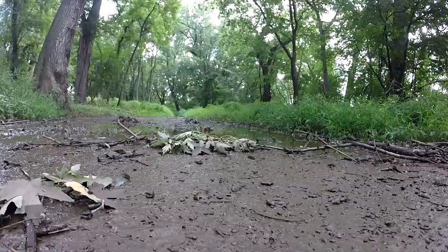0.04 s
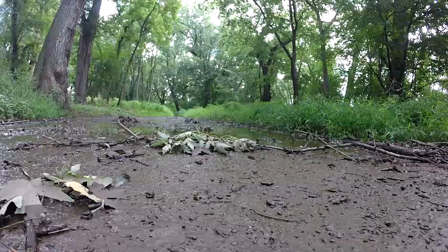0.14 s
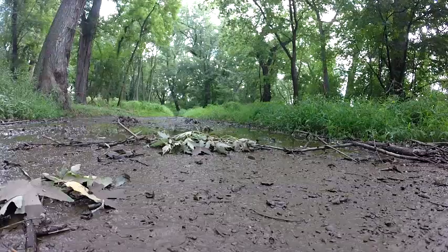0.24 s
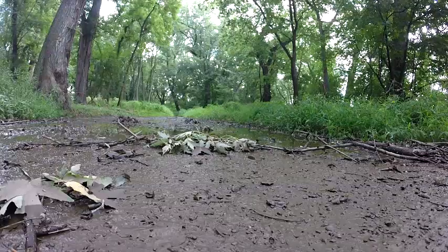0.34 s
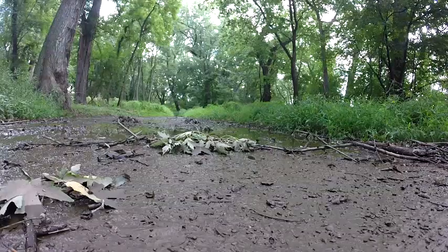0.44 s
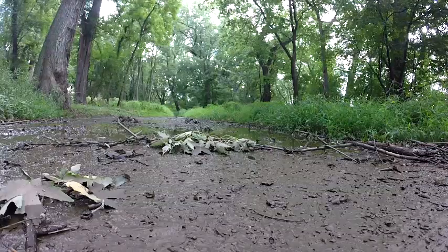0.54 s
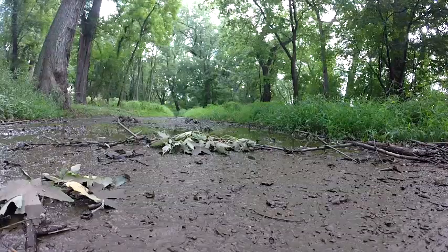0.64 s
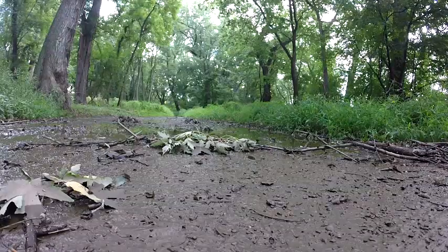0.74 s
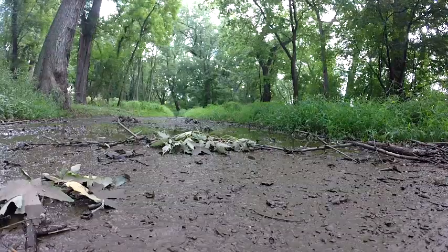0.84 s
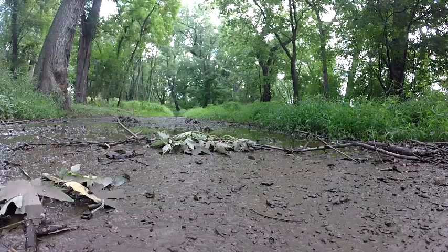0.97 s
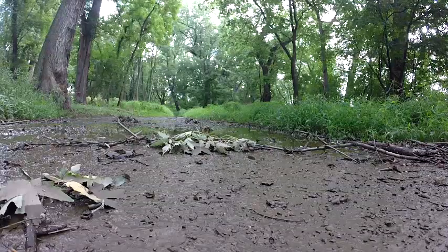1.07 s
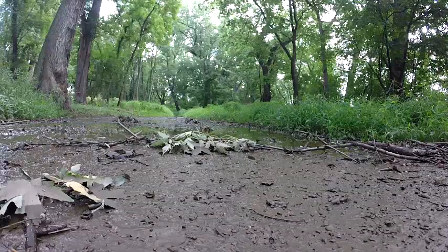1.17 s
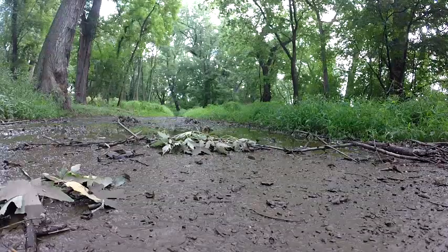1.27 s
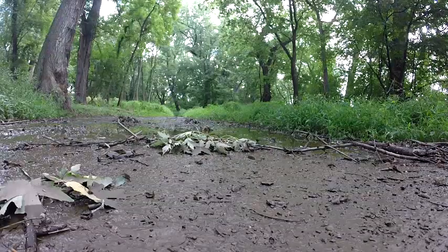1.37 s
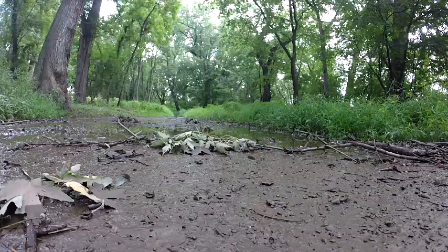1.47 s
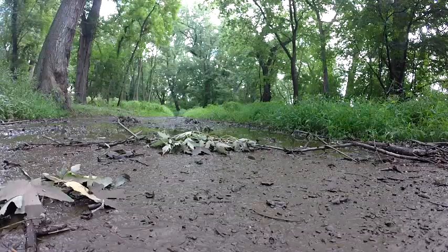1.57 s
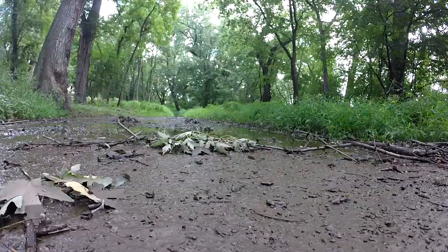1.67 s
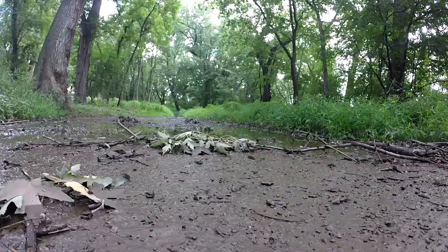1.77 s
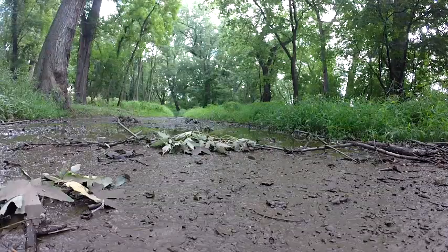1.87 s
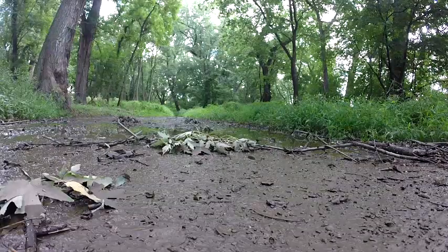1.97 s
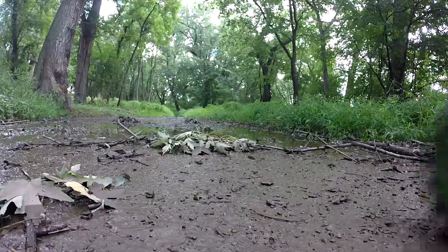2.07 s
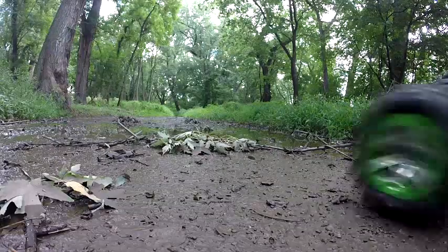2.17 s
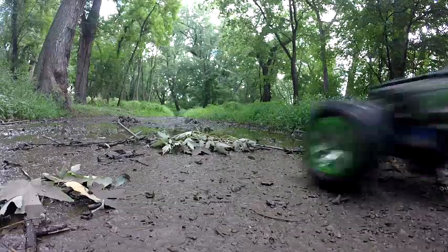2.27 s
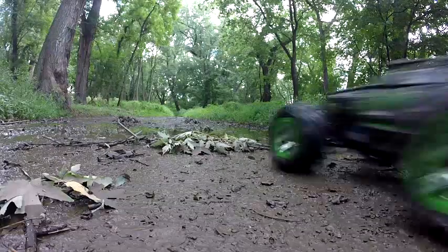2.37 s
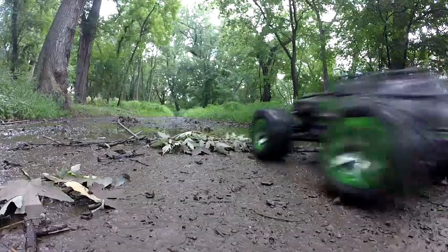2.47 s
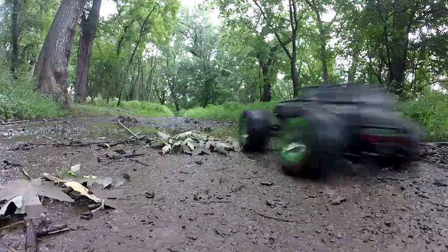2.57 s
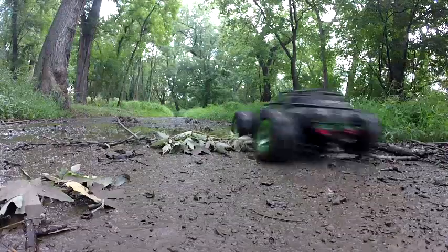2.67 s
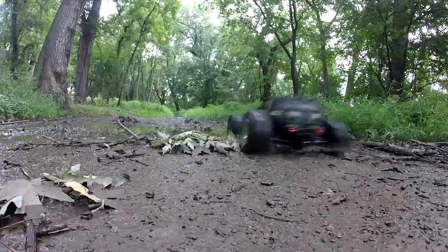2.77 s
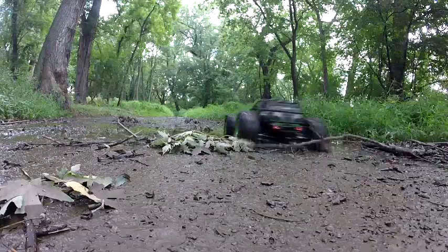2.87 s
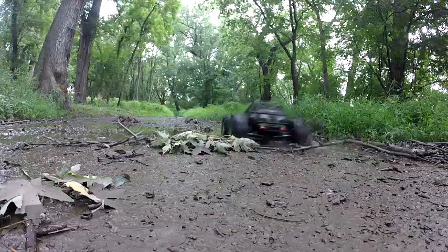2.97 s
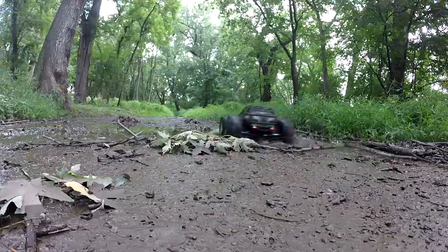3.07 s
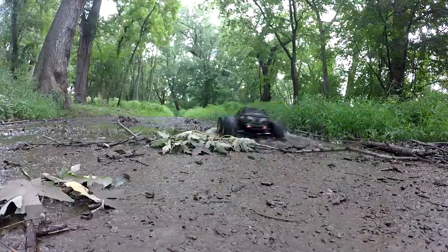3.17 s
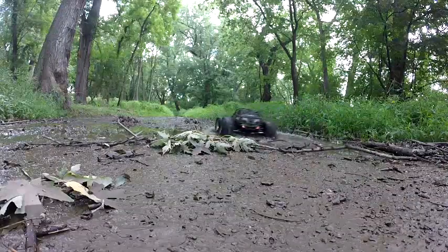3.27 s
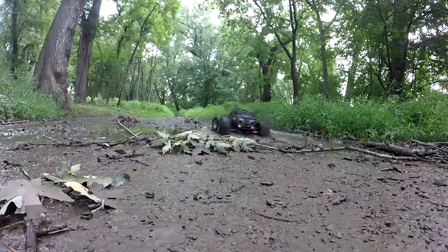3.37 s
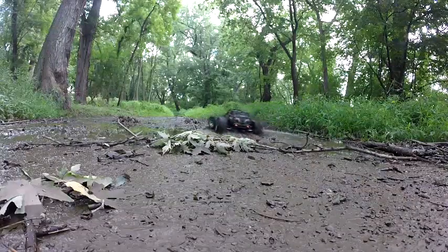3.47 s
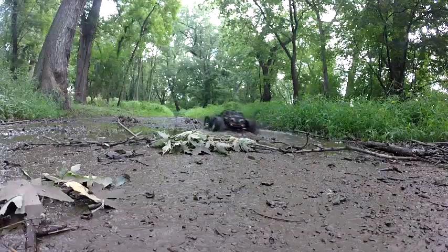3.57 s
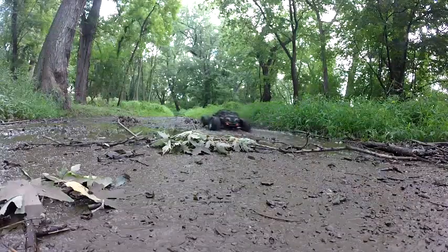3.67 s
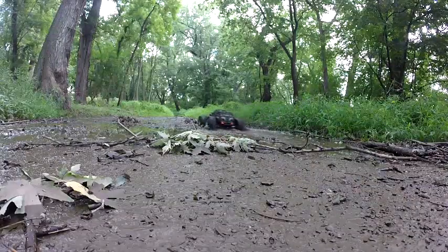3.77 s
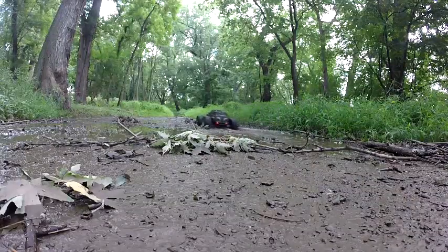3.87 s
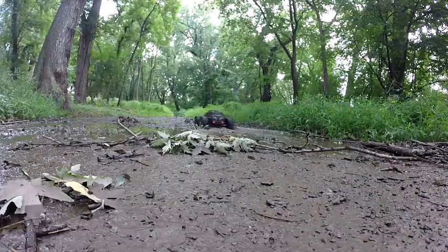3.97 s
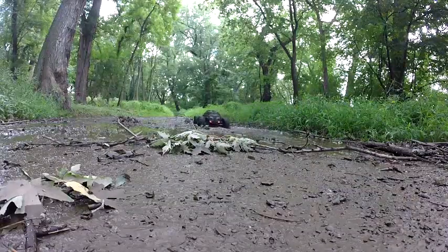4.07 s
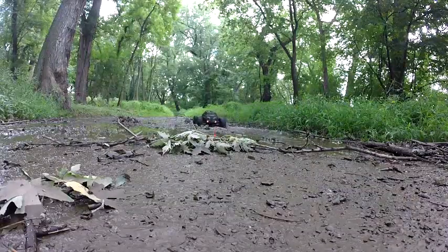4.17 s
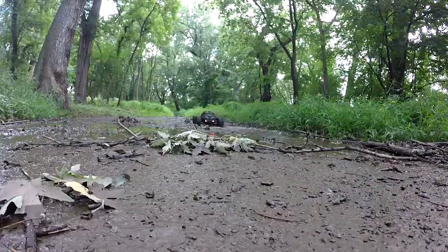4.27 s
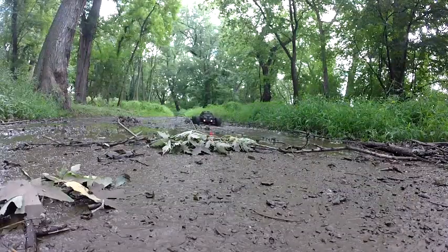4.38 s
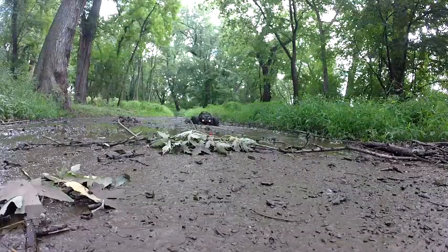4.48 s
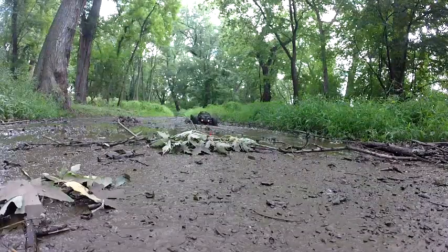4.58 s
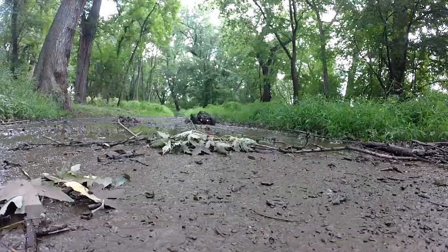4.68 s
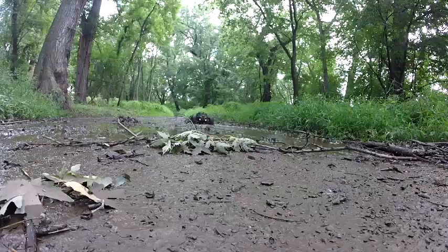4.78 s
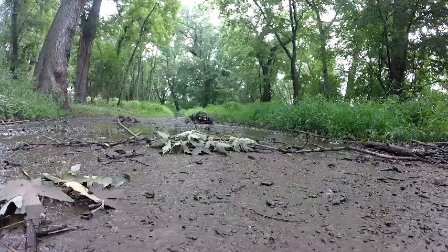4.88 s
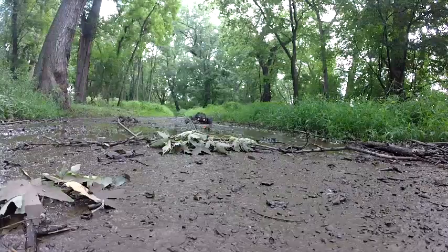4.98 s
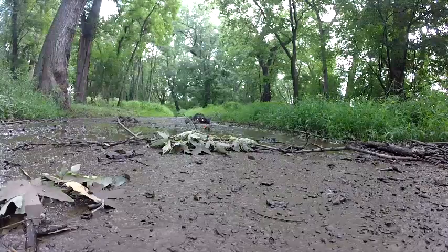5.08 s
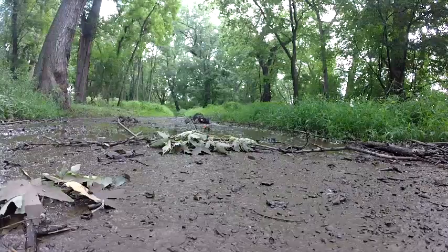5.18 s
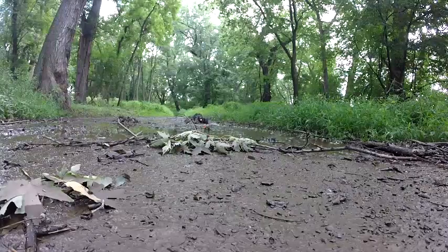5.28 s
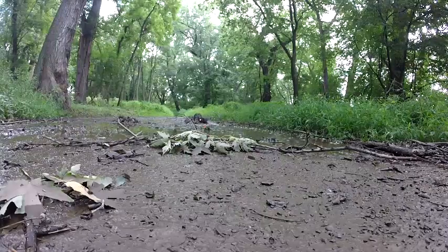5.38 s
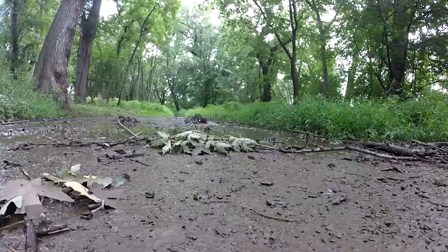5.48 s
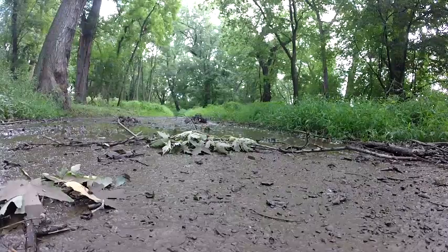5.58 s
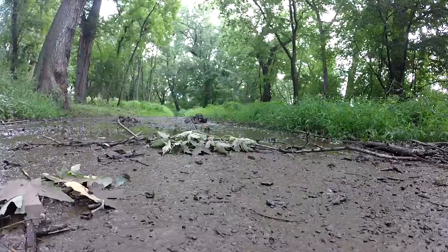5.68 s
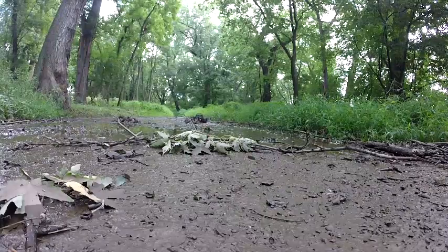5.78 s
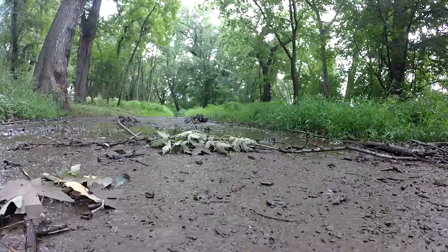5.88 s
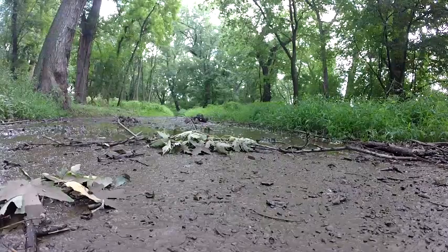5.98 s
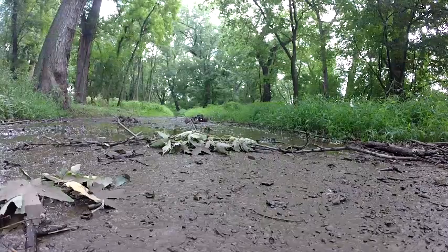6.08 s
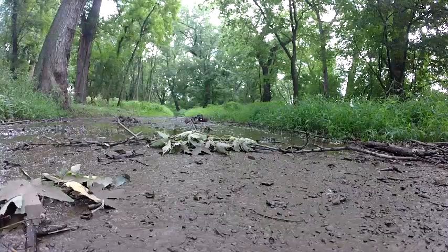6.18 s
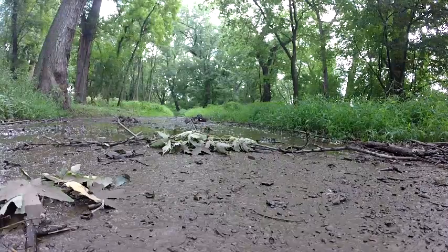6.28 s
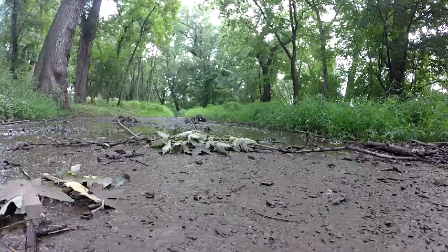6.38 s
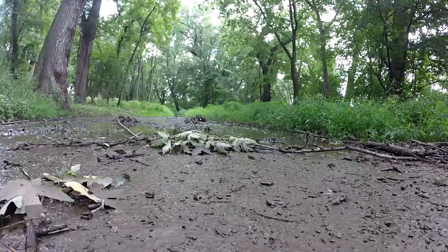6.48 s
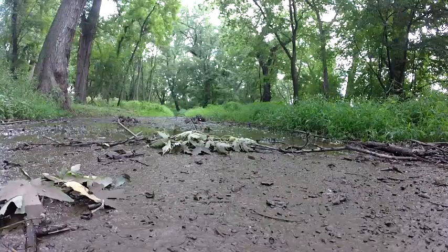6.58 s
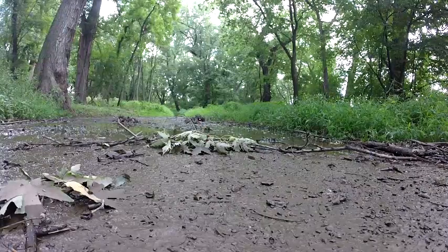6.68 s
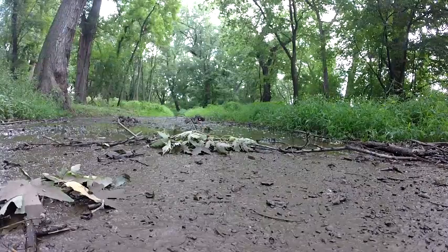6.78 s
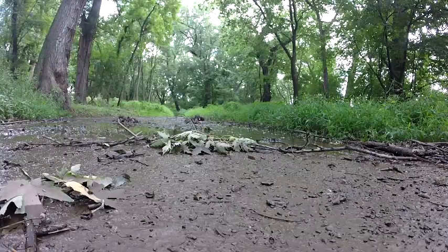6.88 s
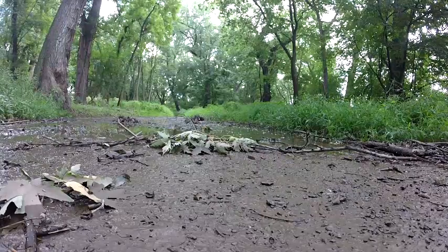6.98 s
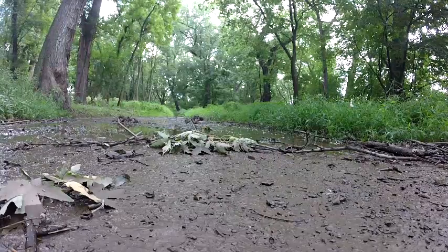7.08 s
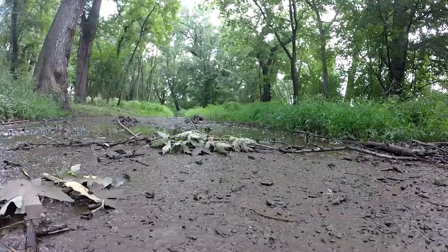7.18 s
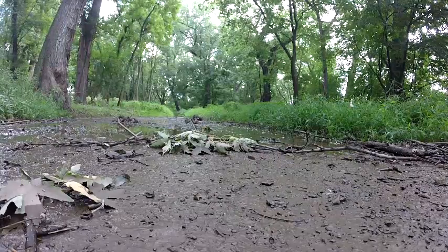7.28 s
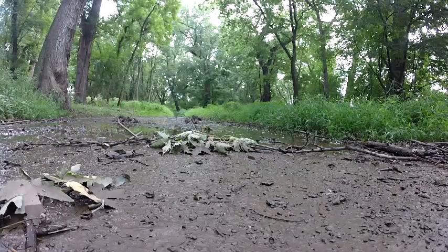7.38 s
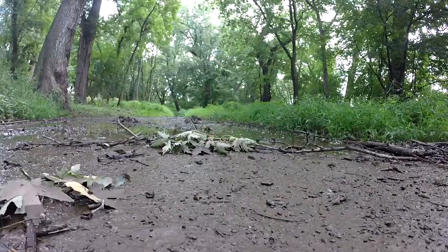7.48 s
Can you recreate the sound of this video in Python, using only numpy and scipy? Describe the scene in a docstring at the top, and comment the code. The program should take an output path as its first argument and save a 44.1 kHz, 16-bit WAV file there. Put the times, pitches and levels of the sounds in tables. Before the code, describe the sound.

A small electric remote-controlled truck approaches from behind a fixed microphone near the ground on a muddy woodland trail. Its raspy gear whine wobbles upward, then jumps sharply in pitch and loudness as it shoots past with plastic rattle and a hiss of wet grit. It recedes, still whining high with throttle flutters, through a brief puddle splash and a few dry stone clicks, with faint tree echo and a low air hush.

```python
"""A gear whine climbs as a small electric truck drives up a muddy forest trail, passes close by and runs off.
One motor speed turns every gear: the meshing teeth whine with the throttle and flare when the motor is dragged
down. Random clashes and shaft buzz ring the plastic chassis and shell, filtered clicks make the spray of wet grit
from the tyres, and stones knock in short cracks. The trees return a faint echo over the low hush of the wood."""
import sys
import numpy as np
from scipy import signal
from scipy.fft import rfft, irfft
from scipy.io import wavfile
from scipy.ndimage import uniform_filter1d

SR = 44100
rng = np.random.default_rng(int(sys.argv[2]) if len(sys.argv) > 2 else 0)


def inscribe(sig):
    """Save sig as 16-bit PCM at rate SR to the path in sys.argv[1].

    A 1-D sig is mono; a 2-D sig holds one channel per row.
    Samples are clipped to [-1, 1] before scaling.
    """
    pcm = np.round(np.clip(np.atleast_2d(sig).T, -1, 1) * 32767)
    wavfile.write(sys.argv[1], SR, pcm.astype(np.int16))


N = 332514
TIME = np.arange(N) / SR  # s
BINS = np.fft.rfftfreq(N, 1 / SR)  # Hz

# How the body radiates a tone: a whine flares as it crosses a resonance, most of all near 2900 Hz.
# Each row: frequency in Hz, gain in dB.
BODY_GAIN = [(850, -21), (1030, -2), (1180, -15.5), (1300, -5.5), (1430, -20), (1580, -12), (1670, -15.5),
             (1790, -5), (1920, -1.5), (2150, -6), (2300, -30), (2500, -20), (2700, -13), (2890, -0.5),
             (3020, -7), (3150, -21.5), (3300, -15.5), (3550, -14.5)]
# A stretch of puddle. In order: start, end, attack and release, all in seconds.
PUDDLE_SPELL = (3.15, 3.58, 0.15, 0.073)

PINION_TEETH, SPUR_TEETH, MOTOR_SLOTS = 14, 69, 12
PASS_S, CLOSEST_M, DRIVE_M_PER_S = 2.3, .5, 2  # moment of passing, least distance, ground speed


def motor_speed():
    """The pinion's tooth-mesh pitch in Hz climbs with the throttle and sags on rough ground."""
    # Each row: time in seconds, mesh pitch in Hz.
    speed_curve = [(0, 1910), (.165, 1678), (.415, 1828), (.555, 2040), (.705, 1856), (.845, 2023),
                   (.96, 2050), (1.08, 2238), (1.205, 1979), (1.53, 2304), (1.675, 2089), (1.99, 2377),
                   (2.09, 2127), (2.17, 2696), (2.255, 2658), (2.34, 3100), (2.585, 3296), (2.665, 3554),
                   (2.735, 3350), (2.81, 3543), (2.885, 3274), (2.97, 3512), (3.125, 3310), (3.235, 3404),
                   (3.36, 3240), (3.745, 3013), (4.045, 3166), (4.19, 3380), (4.32, 3250), (4.475, 3474),
                   (4.595, 3270), (4.77, 3424), (4.88, 3070), (5.06, 3560), (5.13, 3230), (5.35, 3320),
                   (5.415, 3204), (5.5, 3353), (5.58, 3036), (5.655, 3224), (5.91, 3130), (5.98, 2898),
                   (6.07, 3196), (6.15, 2900), (6.32, 3200), (6.435, 3010), (6.5, 3094), (6.92, 3090),
                   (7.03, 3200), (7.39, 3110), (7.45, 2952), (7.54, 3085)]
    seconds, hz = np.transpose(speed_curve)
    smooth_hz = uniform_filter1d(np.interp(TIME, seconds, hz), 1300)
    return smooth_hz * (1 + 0.001986 * wander(15.6))


def pinion(mesh_hz, teeth_passed):
    """The mesh tone and its overtones swell under load; backlash blurs the higher overtones most."""
    # How the gearbox radiates the overtones. Each row: frequency in Hz, relative gain in dB.
    overtone_gain = [(3500, 23), (4400, -10), (4800, 4.5), (5370, 13.5), (5800, 0.5), (6900, 0.5),
                     (7500, 5), (8100, 0), (8800, -9.5), (10400, -13), (11500, -25), (13500, -28)]
    front_load_db, rear_load_db, overtone_load_db = 8.5, 15.5, 3
    db_per_order, slow_db, backlash_rad = -1, -11, 0.21

    angle = 2 * np.pi * teeth_passed + 0.47 * wander(103)
    slack = np.interp(mesh_hz, [2050, 2400], [1, .5])  # the spur gear throbs most at low speed
    bite = throb(teeth_passed, once=.25 * slack, twice=.55 * slack, ragged_db=1.6)

    load = tooth_load(mesh_hz)
    load_db = load * (front_load_db + (rear_load_db - front_load_db) * facing(PASS_S))
    body_db = heard(front_db=-35.0, rear_db=-39, falloff=0.48, punch_db=15.0, turn_s=2.54)
    # close by, the whine also comes straight through the wheel arch
    open_db = heard(front_db=-43.5, rear_db=-55, falloff=2.7, punch_db=0, turn_s=2.06)
    path_gain = gain_of(body_db) * colour(BODY_GAIN, mesh_hz) + gain_of(open_db)
    tone = gain_of(load_db) * path_gain * np.cos(angle)

    overtones = 0
    for k in range(2, 5):
        flutter = swell(4.5, 14) * swell(3, 80)
        backlash = backlash_rad * (mesh_hz / mesh_hz[0]) ** 1.4 * wander(90)  # grows with speed
        level = gain_of(db_per_order * (k - 2)) * colour(overtone_gain, k * mesh_hz)
        overtones += level * flutter * np.cos(k * (angle + backlash))
    speed_db = np.interp(mesh_hz, [1750, 2050], [slow_db, 0])
    overtones_db = heard(front_db=-49, rear_db=-46.0, falloff=1.305, punch_db=5.5, turn_s=2.39)
    overtones_db = overtones_db + speed_db + overtone_load_db * load
    return np.sqrt(2) * bite * (tone + gain_of(overtones_db) * overtones)


def tooth_load(mesh_hz):
    """Slowing presses the teeth together: 0 unless the motor slows, nearing 1 when it is dragged down hard."""
    knee_hz_per_s, lag_s = 3360, 0.015  # the load saturates around the knee
    slowing = np.maximum(-np.gradient(mesh_hz) * SR, 0)
    keep = np.exp(-1 / (lag_s * SR))
    return signal.lfilter([1 - keep], [1, -keep], np.tanh(slowing / knee_hz_per_s))


def throb(teeth_passed, once, twice, ragged_db):
    """The spur gear runs out of true: its teeth bite harder twice a turn, one bite the stronger."""
    angle = 2 * np.pi * teeth_passed / SPUR_TEETH
    return evened(np.exp(once * np.cos(angle) + twice * np.cos(2 * angle)) * swell(ragged_db, 210))


def motor(mesh_hz, teeth_passed):
    """Magnets sing as they pass the slots, and slower gears and the motor shaft hum below the mesh, all through
    the body."""
    # Lower tones below the mesh: at .387 and .469 from slower transmission gears, at .43 the sixth order of the
    # motor shaft (6/14 of the mesh). Each row: multiple of the mesh pitch, relative level in dB.
    low_tones = [(.387, 0.5), (.43, -1), (0.469, -11.5)]
    slot_ratio = MOTOR_SLOTS / PINION_TEETH
    slots_db = heard(front_db=-46, rear_db=-36, falloff=0.62, punch_db=-2, turn_s=2.704)
    slot_tone = np.cos(2 * np.pi * teeth_passed * slot_ratio + 0.28 * wander(65))
    slots = colour(BODY_GAIN, mesh_hz * slot_ratio) * gain_of(slots_db) * slot_tone

    gears = 0
    for ratio, db in low_tones:
        tone = np.cos(2 * np.pi * ratio * teeth_passed + 0.71 * wander(54))
        gears += gain_of(db) * colour(BODY_GAIN, ratio * mesh_hz) * tone
    gears_db = heard(front_db=-47, rear_db=-46.5, falloff=0.77, punch_db=-7, turn_s=2.19)
    return np.sqrt(2) * (slots + gain_of(gears_db) * gears) * swell(1.73, 81)


def rattle(teeth_passed):
    """Clashing teeth and the buzz of the shaft ring the chassis and the shell; puddle water drums on both."""
    # Resonances of the plastic. Each row: frequency in Hz, width in Hz, relative level in dB from the
    # front, relative level in dB from behind.
    chassis_modes = [(974, 92, -9, -16), (1083, 130, -1, -15), (1363, 123, 1, 5), (1581, 152, -4.5, 11),
                     (1660, 150, 1, 5.5), (1762, 164, 9, -11)]
    shell_modes = [(2251, 128, 3, 0), (2531, 205, 3, -1), (2677, 120, 5, 6), (2860, 147, 4, 8),
                   (3390, 174, 0, -1)]
    puddle_db = 4 * spell(*PUDDLE_SPELL)

    behind = facing(2.377)
    bite = throb(teeth_passed, once=0.14, twice=0.039, ragged_db=2.0)
    buzz = gain_of(-11.0 - 4.1 * behind) * shaft_buzz(teeth_passed)
    chassis_drive = bite * (impacts(4000, spread_db=1.2) + buzz)
    shell_drive = bite * (impacts(3500, spread_db=1.5) + gain_of(-3) * buzz)
    chassis = ring(chassis_drive, chassis_modes, behind)
    shell = ring(shell_drive, shell_modes, behind)

    chassis_db = heard(front_db=-36.5, rear_db=-44.0, falloff=1.13, punch_db=8.0, turn_s=2.552) + puddle_db
    shell_db = heard(front_db=-43.0, rear_db=-42.5, falloff=0.6, punch_db=8.5, turn_s=2.2) + puddle_db
    return gain_of(chassis_db) * chassis + gain_of(shell_db) * shell


def shaft_buzz(teeth_passed):
    """Uneven teeth repeat once a turn of the motor: a comb of wavering tones."""
    angle = 2 * np.pi * teeth_passed / PINION_TEETH
    buzz = 0
    for k in range(4, 22):
        if k in (MOTOR_SLOTS, PINION_TEETH):  # these orders sound in motor() and pinion()
            continue
        phase = 0.5 * wander(30) + 2 * np.pi * rng.random()
        buzz += swell(11.6, 19) * np.cos(k * angle + phase)
    return evened(buzz)


def ring(drive, modes, behind):
    """Steep resonances whose strengths change as the truck turns its back."""
    out, spectrum = np.zeros(N), rfft(drive)
    for hz, width, front_db, rear_db in modes:
        band = irfft(spectrum / (1 + 1.3j * (BINS - hz) / width) ** 2, N)
        out += band * gain_of(front_db + behind * (rear_db - front_db))
    return evened(out)


def tyres():
    """Knobs fling wet grit in uneven clumps; its finest fizz carries only a short way."""
    # Colour of the spray. Each row: frequency in Hz, relative level in dB.
    spray_colour = [(450, -12.5), (900, -9), (3700, -8), (4300, 5.5), (4550, 2), (4780, 6), (5150, -4.5),
                    (5650, 5.5), (6300, -2), (7000, -2), (7800, -9.5), (9500, -16), (11300, -25.5),
                    (12600, -26.5), (15000, -37)]
    grit = rfft(impacts(9000, spread_db=2.0) * gain_of(1.6 * wander(57)))
    spray = evened(irfft(grit * colour(spray_colour, BINS), N))
    fizz = evened(signal.lfilter(*signal.butter(2, 9000, "highpass", fs=SR), spray))
    spray_db = heard(front_db=-44.5, rear_db=-38.5, falloff=1.053, punch_db=9.5, turn_s=2.3)
    spray_db = spray_db + 3.0 * spell(*PUDDLE_SPELL)
    fizz_db = -3.5 + 0.34 * (spray_db - spray_db.max())  # relative to the spray
    return gain_of(spray_db) * (spray + gain_of(fizz_db) * fizz)


def knocks():
    """Stones and twigs strike the truck: each blow is a short noise crack and a brief ring of plastic."""
    # Each row: time in seconds, peak level in dB, pitch of the crack in Hz, its width in octaves.
    blows = [(3.590, -27, 2500, .6), (4.045, -35, 4500, 1), (5.052, -33, 3000, 1), (5.1086, -28, 4900, 1.6),
             (5.1605, -39, 3000, 1), (6.544, -34, 4800, 1.4), (7.1405, -40, 4500, 1.3)]
    # What the plastic rings with. Each row: frequency in Hz, relative level in dB, 60 dB decay in seconds.
    plastic_modes = [(2240, 22.5, 0.015), (2580, -27, 0.019), (2850, 30, 0.018), (4070, -30, 0.023)]
    crack_s, ring_db = .001, -1  # decay time of the crack, ring relative to the crack

    out, t = np.zeros(N), np.arange(2048) / SR
    body = sum(gain_of(db - 60 * t / t60) * np.sin(2 * np.pi * hz * t) for hz, db, t60 in plastic_modes)
    for start_s, db, hz, octaves in blows:
        half_width = 2 ** (octaves / 2)
        band = signal.butter(2, [hz / half_width, hz * half_width], "bandpass", fs=SR)
        crack = signal.lfilter(*band, rng.standard_normal(len(t)) * np.exp(-t / crack_s))
        blow = gain_of(ring_db) * body / abs(body).max() + crack / abs(crack).max()
        out[round(start_s * SR):][:len(t)] += gain_of(db) * blow / abs(blow).max()
    return out


def trees(x):
    """Sparse echoes from the trunks, dulled and dying away."""
    t60, wet_db, echoes_per_s = 0.99, -11, 1500
    t = np.arange(SR) / SR
    sparse = rng.standard_normal(SR) * (rng.random(SR) < echoes_per_s / SR)
    taps = sparse * (t > .008) * gain_of(-60 * t / t60)
    tail = signal.lfilter(*signal.butter(1, 5000, fs=SR), taps / np.linalg.norm(taps))
    return gain_of(wet_db) * signal.fftconvolve(x, tail)[:N]


def hush():
    """Steady low air of the wood: noise shaped by a falling spectrum."""
    # Each row: frequency in Hz, relative level in dB.
    air_colour = [(15, -10), (30, -1.5), (60, 0.5), (120, -0.5), (250, -4.5), (500, -8.5), (1000, -13),
                  (2000, -16), (4000, -18.5), (8000, -28.5), (12000, -37), (15000, -40)]
    air = irfft(rfft(rng.standard_normal(N)) * colour(air_colour, BINS), N)
    return gain_of(-55.5) * evened(air)


def heard(front_db, rear_db, falloff, punch_db, turn_s):
    """Level in dB of one part of the truck, from the side it shows, its distance and a punch of throttle."""
    # The punch of throttle close by. In order: start, end, attack and release, all in seconds.
    punch_spell = (2.127, 2.255, 0.015, 0.017)
    side_db = front_db + (rear_db - front_db) * facing(turn_s)
    return side_db + falloff * nearness_db() + punch_db * spell(*punch_spell)


def nearness_db():
    """Spreading loss along a straight path, 0 dB at the closest point."""
    return -20 * np.log10(np.hypot(1, DRIVE_M_PER_S * (TIME - PASS_S) / CLOSEST_M))


def facing(turn_s, over_s=0.045):
    """0 while the front of the truck is heard, 1 once its back is."""
    return .5 + .5 * np.tanh((TIME - turn_s) / over_s)


def spell(start, end, attack, release):
    """Attack, hold and release, from 0 to 1."""
    rise = 1 - np.exp(-np.maximum(TIME - start, 0) / attack)
    return rise * np.exp(-np.maximum(TIME - end, 0) / release)


def impacts(per_s, spread_db):
    """Random clicks of either sign, a few of them large, at rms 1."""
    size = gain_of(spread_db * np.minimum(rng.exponential(1, N), 5)) * rng.choice([-1, 1], N)
    return evened(size * (rng.random(N) < per_s / SR))


def wander(rate_hz):
    """Slow random drift of rms 1, up to about the given rate."""
    size = 8192
    steps = np.linspace(0, N / SR, size)
    lowpass = 1 / (1 + (np.fft.rfftfreq(size, steps[1]) / rate_hz) ** 4)
    slow = irfft(rfft(rng.standard_normal(size)) * lowpass)
    return evened(np.interp(TIME, steps, slow))


def swell(db, rate_hz):
    """A random gain of rms 1 that swings by about so many dB either way."""
    return evened(gain_of(db * np.tanh(wander(rate_hz))))


def colour(points, hz):
    """Gain of a short spectrum at the given frequencies, interpolated over log frequency."""
    f, db = np.transpose(points)
    return gain_of(np.interp(np.log(hz + 1), np.log(f), db))


def gain_of(db):
    """Decibels to an amplitude factor."""
    return 10 ** (np.asarray(db) / 20)


def evened(x):
    """Scales to rms 1."""
    return x / np.sqrt(np.mean(x ** 2) + 1e-20)


def scene():
    """One motor speed turns every gear; close by, the direct sound outweighs the echo."""
    mesh_hz = motor_speed()
    teeth_passed = np.cumsum(mesh_hz) / SR
    gears = pinion(mesh_hz, teeth_passed) + motor(mesh_hz, teeth_passed)
    truck = gears + rattle(teeth_passed) + tyres() + knocks()
    echo_db = np.minimum(-5.5 - 0.75 * nearness_db(), 1.5)  # more echo send with distance
    return (truck + trees(truck * gain_of(echo_db)) + hush())[None]


def record(dry):
    """A steep low-pass limits the band to about 15 kHz."""
    lowpass = signal.firwin(511, 15250, window=("kaiser", 9), fs=SR)
    return signal.oaconvolve(dry, lowpass[None], "same")


dry = scene()
out = record(dry)
inscribe(out)
```